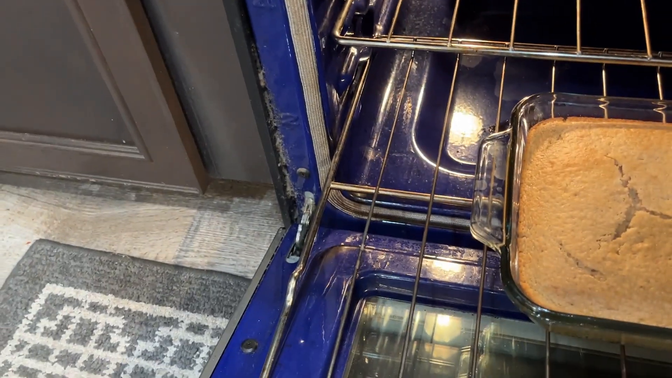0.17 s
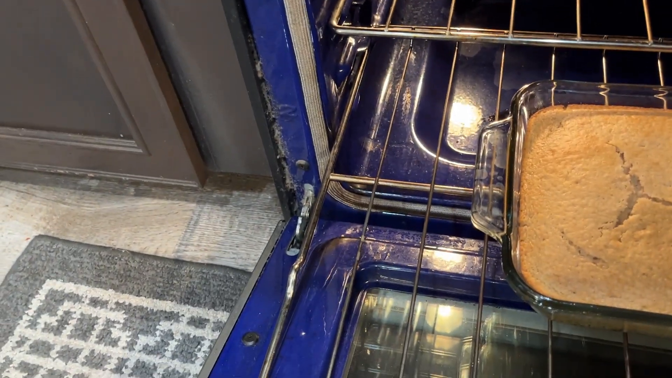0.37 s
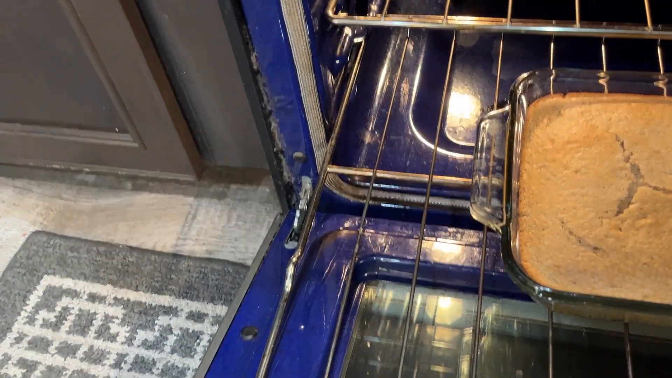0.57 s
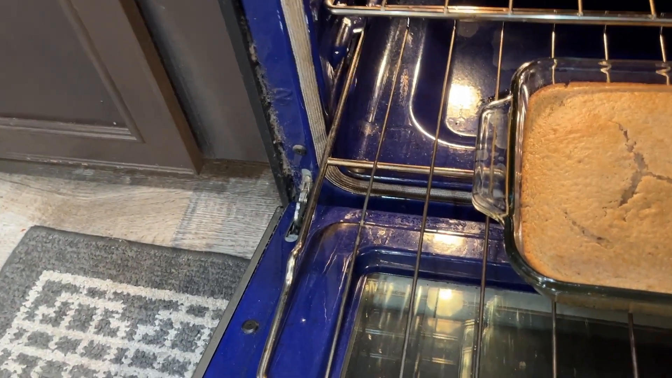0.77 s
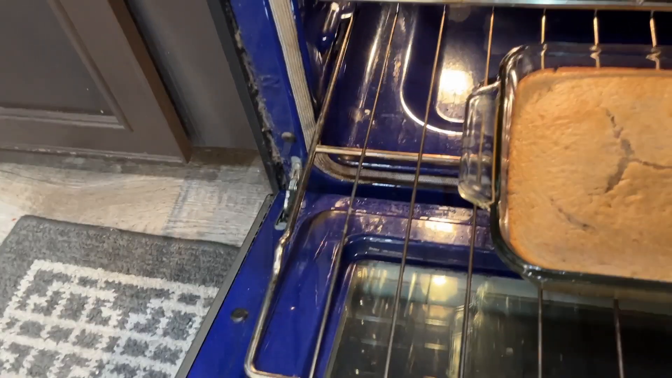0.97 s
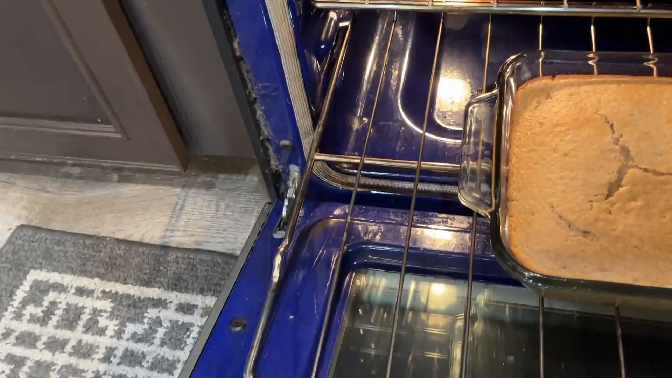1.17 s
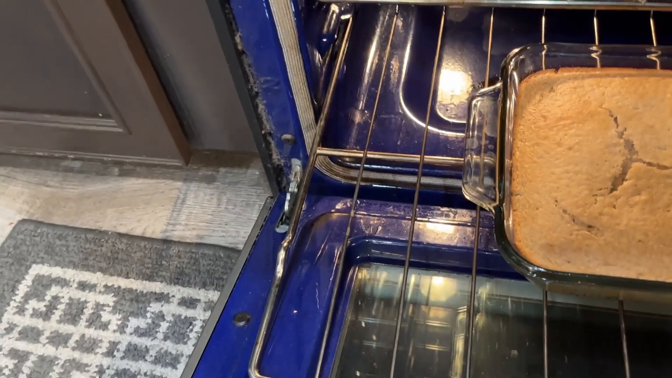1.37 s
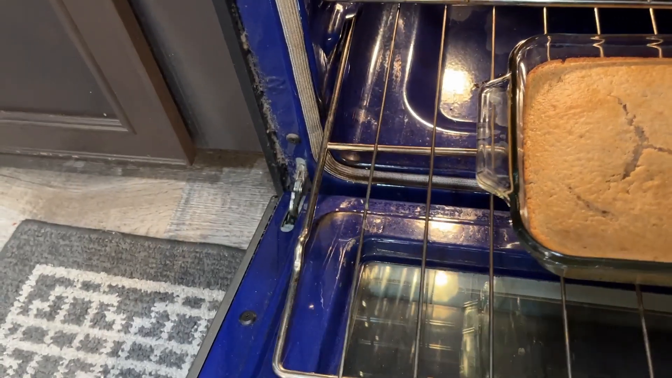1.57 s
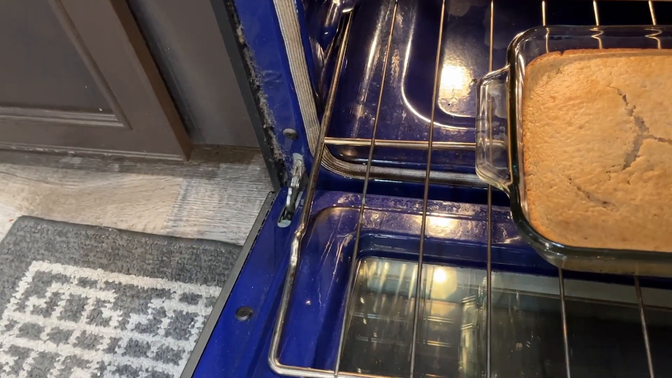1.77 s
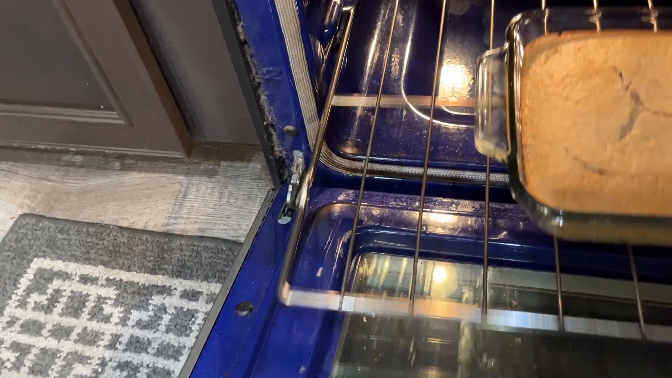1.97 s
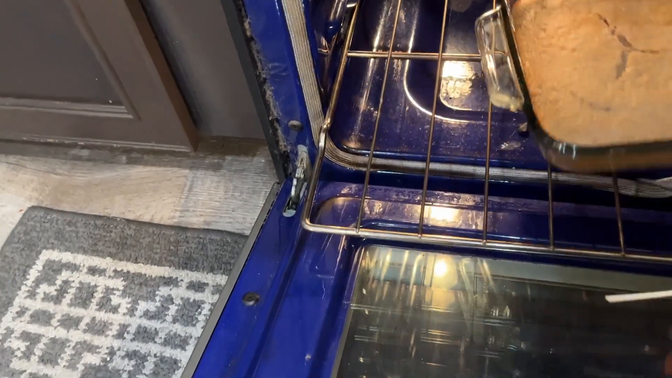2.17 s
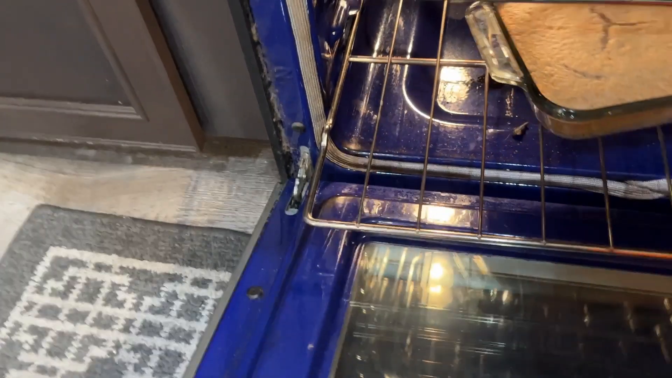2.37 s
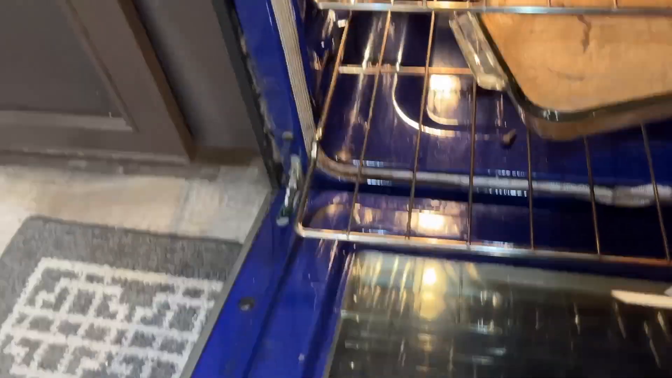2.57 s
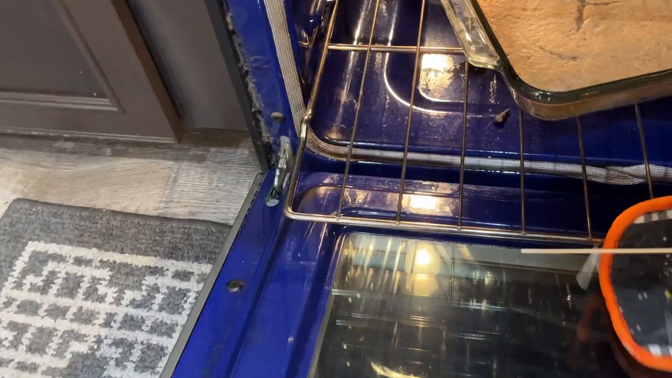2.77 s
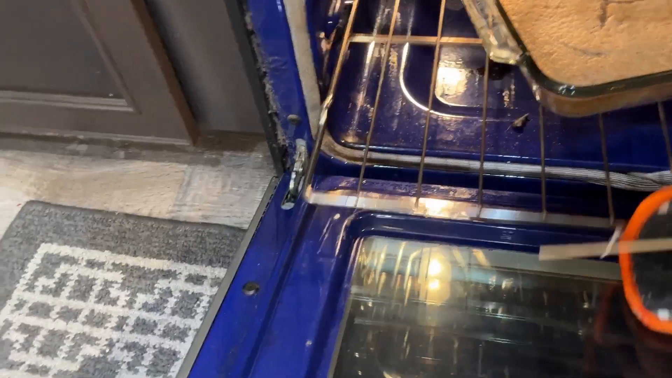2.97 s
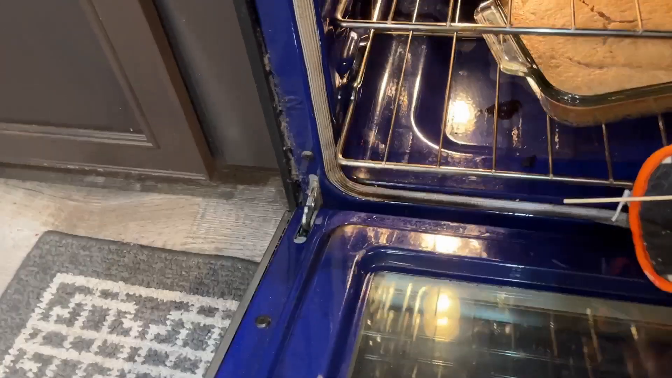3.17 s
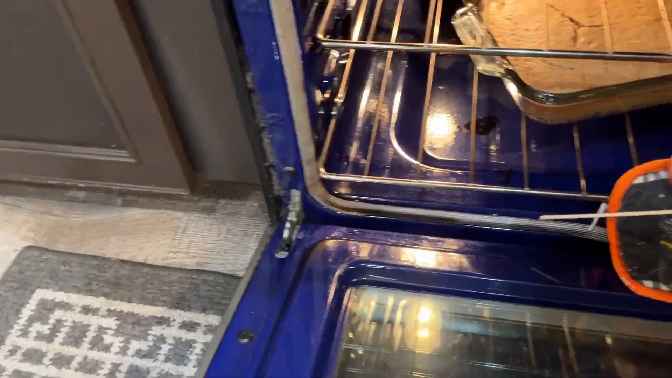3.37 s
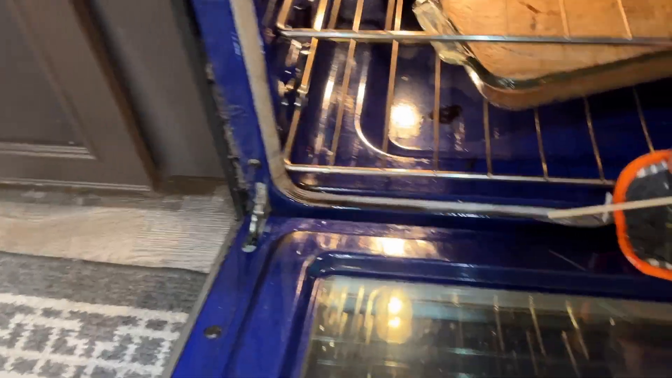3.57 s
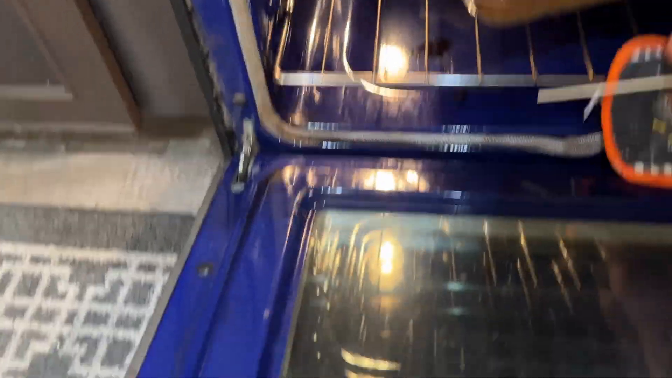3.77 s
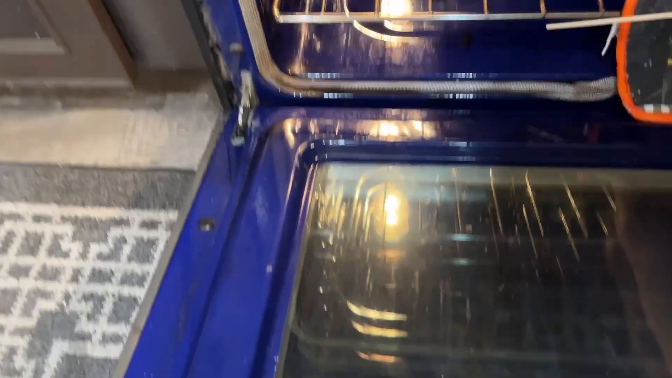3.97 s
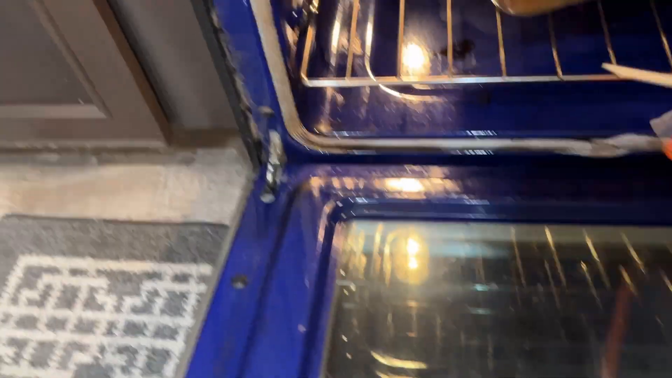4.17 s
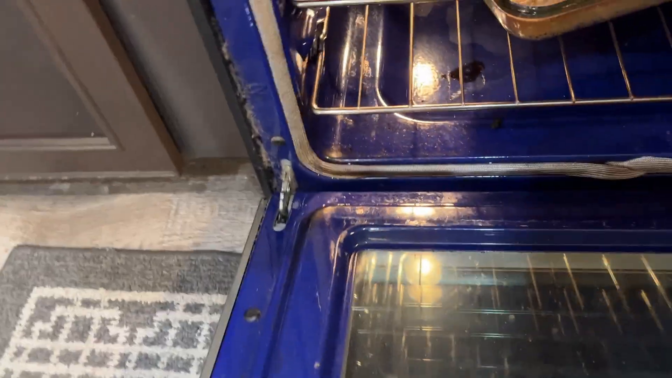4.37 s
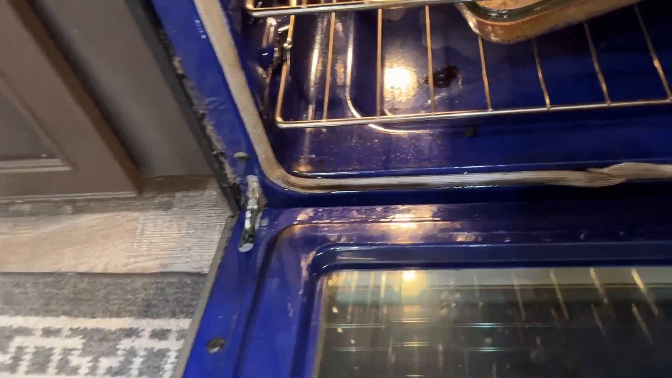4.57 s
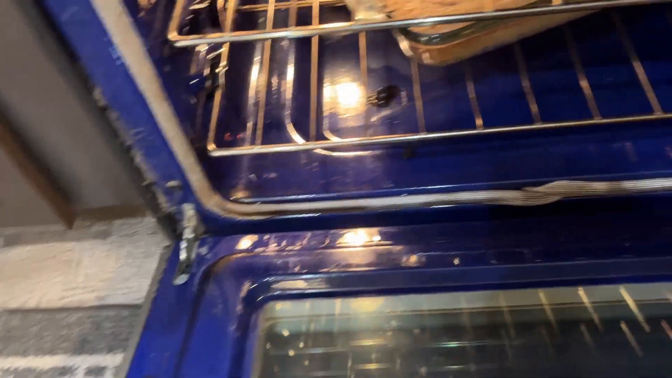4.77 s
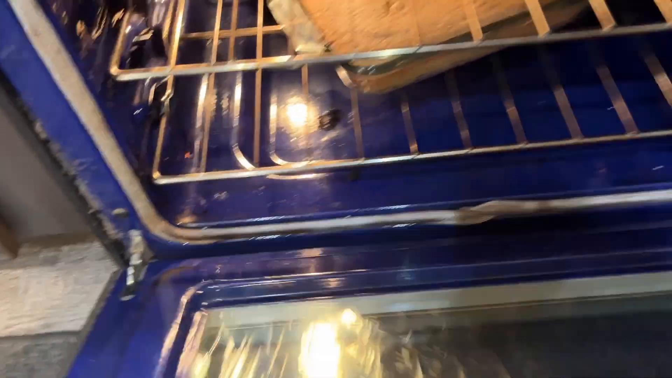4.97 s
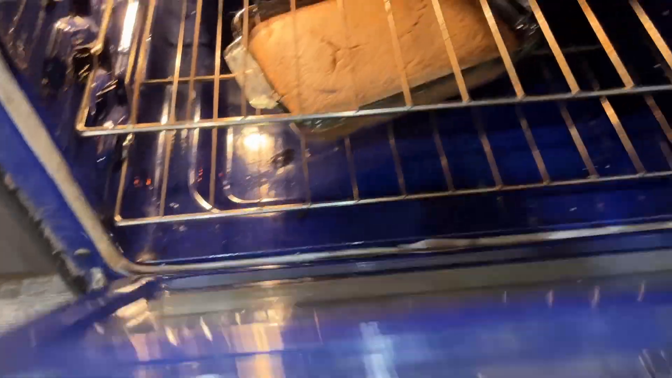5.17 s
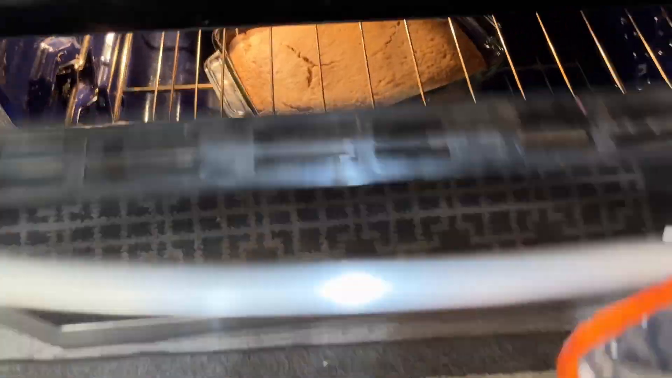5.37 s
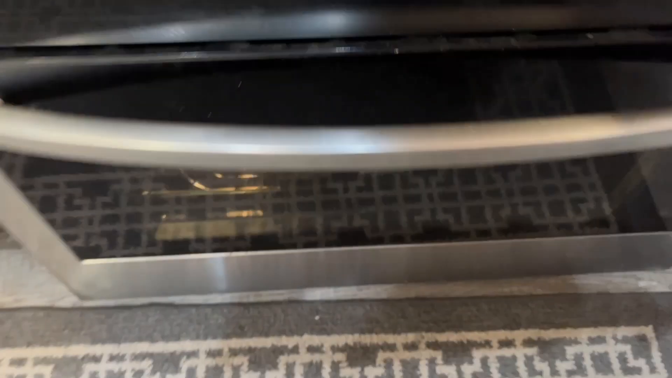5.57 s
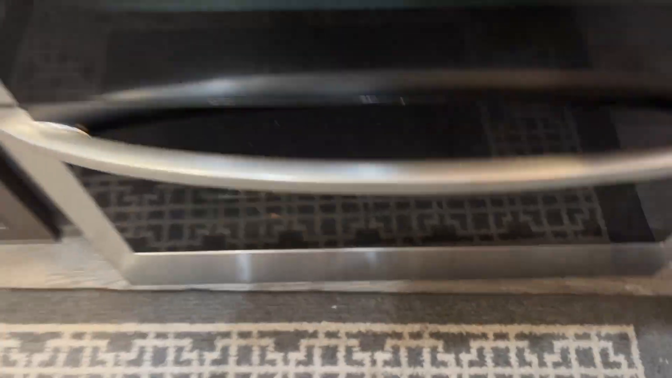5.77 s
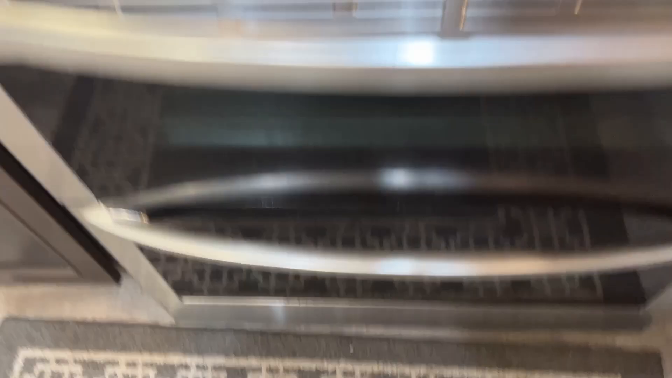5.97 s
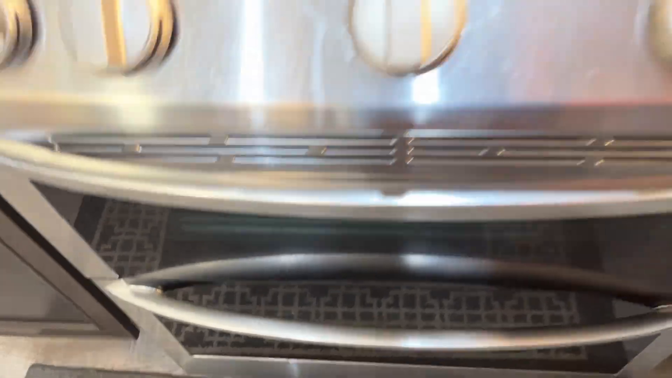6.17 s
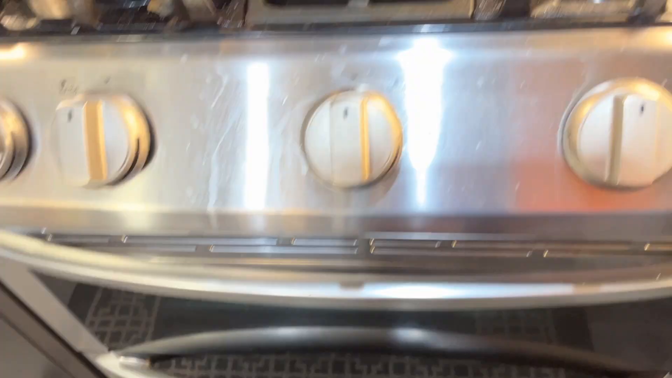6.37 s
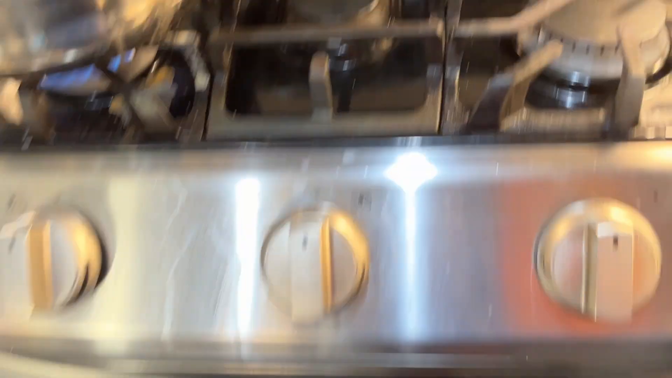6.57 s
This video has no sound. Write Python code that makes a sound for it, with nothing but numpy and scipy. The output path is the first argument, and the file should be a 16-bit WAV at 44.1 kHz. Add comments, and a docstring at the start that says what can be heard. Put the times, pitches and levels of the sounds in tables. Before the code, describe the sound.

A wire oven rack holding a glass dish scrapes and clanks inward in bursts, then the oven door shuts with a heavy thud under a steady fan roar.

```python
"""A kitchen fan roars from start to end round a phone held in the hand near an oven; one early knock.
From about 1.4 s a wire oven rack with a glass dish is shoved along its runners in scrapes and knocks,
until 3.8 s: tiny slips, bounces and blows ring wires, glass and oven walls as decaying modes.
A lone tick follows, then hinge and springs squeak as narrow noise and near 5.6 s the heavy door shuts,
pushing a gust of air; squeaks go on after it. Left and right differ in phase and balance by frequency."""
import sys
import numpy as np
from scipy import signal
from scipy.fft import rfft, irfft
from scipy.io import wavfile
from scipy.ndimage import uniform_filter1d

SR = 44100
rng = np.random.default_rng(int(sys.argv[2]) if len(sys.argv) > 2 else 0)


def master_out(mix):
    """Clip the mix to full scale and print it as 16-bit PCM to the path in sys.argv[1]."""
    frames = np.transpose(np.atleast_2d(mix))
    ceiling = np.clip(frames, -1, 1)
    pcm = np.round(ceiling * 32767).astype(np.int16)
    wavfile.write(sys.argv[1], SR, pcm)


N = 291324

# Table levels are those ahead of the gains in the functions; spectra give shape only.
# Shoves of the rack: (top [s], rise [s], hold [s], t60 [s], scrape level [dB],
# fizz relative to scrape [dB], rumble level of the oven walls [dB])
SHOVES = [ (1.463, 0.11, 0.091, 0.49, -40.5, -18, -26.5), (1.919, 0.061, 0.072, 0.32, -34, -16, -30),
          (1.976, .005, 0.045, .3, -28, -19, -24.5), (2.028, 0.026, 0.035, 0.37, -20.5, -16, -21),
          (2.094, 0.059, 0.04, 0.3, -24, -14.5, -21.5), (2.203, 0.041, 0.04, 0.69, -31.5, -20.5, -26.5),
          (2.397, 0.035, 0.013, 0.25, -33, -20, -23), (2.454, 0.062, 0.047, 0.48, -61, -28, -26.5),
          (2.788, 0.058, 0.021, 0.18, -43, -36, -29), (2.85, 0.021, 0.011, 0.14, -47.5, -0.5, -50),
          (2.967, 0.1, 0.028, 0.33, -36.5, -15, -27), (2.994, 0.013, 0.044, 0.35, -27.5, -12.5, -19.5),
          (3.058, 0.061, 0.047, 0.65, -29.5, -18, -38), (3.693, 0.015, 0.014, 0.18, -28.5, -9, -20),
          (3.747, 0.02, 0.02, 0.2, -36, -12, -24.5), (3.782, 0.098, 0.038, 0.23, -34, -17.5, -31), ]
# Wires and bars of rack and runners: (frequency [Hz], level [dB], t60 [s])
RACK_MODES = [(360, 7.5, 0.035), (438, 2.5, 0.019), (630, -5, 0.043), (693, -21, 0.25), (820, -26, 0.13),
              (844, -2.5, 0.04), (928, -10, 0.11), (1075, 4.5, 0.035), (1172, -4, 0.2), (1240, -0.5, 0.053),
              (1310, 0.5, 0.066), (1485, -5, 0.16), (1710, -2, 0.039), (1987, -2, 0.037),
              (2204, -8.5, 0.025), (1922, -11, 0.12), (2284, -6, 0.068), (2460, -5, 0.015),
              (2594, -5, 0.032), (2865, -16, 0.11), (3100, -3, 0.023), (3340, -7, 0.048),
              (3490, -20, 0.042), (3865, -12, 0.056), (4320, -4.5, 0.019), (5150, -18, 0.027),
              (5400, -45, 0.03), (5900, -40, 0.024), (6140, -24, 0.093), (6800, -33, 0.024)]
# Unringing contact of metal on metal: (frequency [Hz], level [dB per Hz])
GRIT_SPECTRUM = [(300, -34), (700, -2), (2200, -7), (4000, -12), (7500, -34), (9000, -50)]
# Fine fizz of the scrape: (frequency [Hz], level [dB per Hz])
FIZZ_SPECTRUM = [(5000, 0.5), (7500, 1.5), (9600, -0.5), (11500, -1), (13500, -1.5), (15500, -11)]
# Treble of a knock: (frequency [Hz], level [dB per Hz])
SNAP_SPECTRUM = [(3000, -7), (6000, -5), (9600, -1.5), (11500, -7.5), (13000, -9), (15500, -14)]
# Metal knocks and ticks: (time [s], clank level [dB], fizz relative to clank [dB],
# rattle t60 [s], pitch centre [Hz])
KNOCKS = [(0.0326, -29, -9.5, 0.097, 3820), (1.4484, -43, -4, 0.07, 2000),
          (1.5197, -35.5, -8.5, 0.066, 2000), (1.966, -16.5, -40, 0.22, 1570),
          (2.030, -18, -22, 0.09, 2150), (2.052, -20, -19, 0.064, 1290), (2.082, -23, -6.5, 0.09, 3200),
          (2.124, -24, -5, 0.046, 3180), (2.2234, -37, -17, 0.058, 2700), (2.399, -23.5, -17, 0.12, 2500),
          (2.7853, -20.5, -43, 0.092, 2160), (2.836, -30.5, -20, 0.11, 2700),
          (2.8593, -29.5, -19, 0.1, 2800), (2.9947, -21, -14, 0.1, 1960), (3.02, -19, -23, 0.059, 1250),
          (3.064, -21, -21, 0.037, 1160), (3.689, -21.5, -18.5, 0.21, 3100),
          (4.4726, -28, -4.5, 0.043, 4500), (5.0912, -33.5, -22, 0.044, 2920),
          (5.349, -31.5, -8.5, 0.04, 3100), (5.5285, -19.5, -27, 0.047, 1500),
          (5.585, -16, -7, 0.029, 5460), (5.614, -19.5, -24, 0.033, 3900),
          (5.6277, -17.5, -27, 0.037, 3900), (5.633, -24.5, -28, 0.04, 3300),
          (5.682, -24, -25, 0.023, 3830)]
# Single short rings: rack wires, then from 5.5 s door catch rattle and springs:
# (time [s], level [dB], pitch [Hz], t60 [s])
SHORT_RINGS = [(1.902, -31, 1970, .07), (1.951, -26, 1284, .06), (1.965, -20, 1284, 0.16),
               (1.967, -20.5, 2020, .1), (1.978, -31, 3460, .05), (1.995, -22, 2250, 0.077),
               (2.027, -17, 3180, .06), (2.030, -19, 2190, 0.11), (2.040, -13, 1288, 0.091),
               (2.045, -15, 690, .09), (2.086, -16, 350, .08), (2.092, -21, 1682, 0.086),
               (2.098, -33, 1320, .08), (2.105, -29, 2220, 0.071), (2.075, -19, 2100, 0.062),
               (2.112, -12, 3170, 0.044), (2.133, -22, 3270, .05), (2.142, -17, 1070, .06),
               (2.202, -28, 2640, 0.14), (2.238, -22, 920, .08), (2.243, -35.5, 3470, .07),
               (2.262, -32, 1250, .07), (2.962, -27, 2010, 0.12), (2.984, -21, 1250, .05),
               (2.992, -18, 1963, .08), (2.997, -13.5, 352, 0.076), (3.004, -16.5, 1926, 0.06),
               (3.008, -18, 3450, 0.051), (3.010, -22, 1310, 0.11), (3.033, -19, 1310, 0.057),
               (3.066, -22, 1176, 0.11), (3.070, -25, 1990, .09), (3.105, -27, 2230, 0.073),
               (3.109, -32, 1100, 0.067), (3.097, -28, 1940, .08), (3.132, -25, 2040, .08),
               (3.182, -24, 1320, .04), (3.687, -22, 2880, 0.056), (3.694, -29, 2140, .07),
               (3.700, -18.5, 440, 0.066), (3.712, -24, 3280, .08), (3.714, -33, 394, 0.058),
               (3.750, -33, 2210, .1), (3.755, -26, 1200, .08), (3.817, -29, 2200, .1),
               (3.832, -28, 1260, .06), (5.530, -27, 3540, .06), (5.585, -21, 5130, .03),
               (5.614, -32, 3900, .03), (5.628, -27, 3840, 0.04), (5.629, -28, 4350, .035),
               (5.633, -28, 3300, .03), (5.684, -35, 4000, .03), (5.703, -26, 1780, 0.054),
               (5.748, -25, 1874, 0.071), (5.755, -29, 1710, 0.066), (5.827, -36, 1254, .07),
               (5.872, -31, 1890, 0.068)]
# A short wire end: (frequency [Hz], level [dB], t60 [s])
WIRE_END_MODES = [(10550, 0, .1), (10700, -6, .06), (11000, -6, .05), (11600, -3, .05)]
# Taps on the wire end: (time [s], level [dB])
WIRE_END_TAPS = [(2.084, -23.5), (2.224, -27.5)]
# Glass dish: (frequency [Hz], level [dB], t60 [s])
DISH_MODES = [(4000, -2, 0.035), (4300, 3.5, 0.032), (4460, -1.5, 0.03), (4670, -10, 0.037),
              (4870, -18, 0.025), (5130, -20, 0.023)]
# The dish chatters on the wires: (rise [s], hold [s], t60 [s], level [dB])
DISH_CHATTER = (0.03, 0.09, 0.18, -37.5)
# Oven walls: (frequency [Hz], level [dB], t60 [s])
WALL_MODES = [(90.4, -8, 0.12), (114.4, 0, 0.13), (164, -9, 0.058), (241, -14.5, 0.24), (274, -13, 0.092)]
# The rack thumps its stops: (time [s], level [dB])
STOP_BLOWS = [(2.062, -7), (2.088, -7), (2.112, -3), (2.148, -20), (2.175, -7), (2.203, -9), (3.011, -5.5),
              (3.029, -17), (3.058, -15), (3.229, -9), (3.712, -18), (3.731, -5), (3.744, -9)]
# Deep thud, as of the whole door on its seal: (frequency [Hz], level [dB], t60 [s])
THUD_MODES = [(45, -13, .06), (64, -6, .08), (76, 0, .075), (124, -11, .06), (165, -12, .06)]
# Deep dull blows: the early one from the rack knocking, later ones from the door shutting:
# (time [s], level [dB])
THUD_BLOWS = [(1.598, -22), (5.600, -9), (5.6132, 1.5), (5.6385, 0.5), (5.680, -14), (5.702, -12),
              (5.715, -12)]
# Middle thump, as of the inner door panel: (frequency [Hz], level [dB], t60 [s])
PANEL_MODES = [(194, -11, 0.04), (279, -2.5, 0.065), (346, -1.5, 0.071), (411, -3, 0.042), (530, -5, 0.022),
               (700, -6, 0.034), (825, -15.5, 0.041), (1067, -15.5, 0.047), (1250, -18, 0.025),
               (1530, -19, 0.029)]
# Dull blows: early ones from the rack knocking, later ones from the door shutting:
# (time [s], level [dB])
PANEL_BLOWS = [(1.601, -15.5), (3.226, -26), (5.530, -8), (5.5785, -6.5), (5.600, -13.5), (5.651, -19)]
# Door catch: (frequency [Hz], level [dB], t60 [s])
LATCH_MODES = [(1155, -5, 0.038), (1337, -2, 0.051)]
# Blows to the catch: (time [s], level [dB])
LATCH_BLOWS = [(5.614, -19), (5.630, -16)]
# Air pushed by the closing door: (rise [s], hold [s], t60 [s], level [dB]);
# the hold is below 0, so decay sets in ahead of the top and the peak stays under the level
DOOR_GUST = (0.6, -0.94, 8.5, -27)
# Squeaks of hinge and springs: (start [s], length [s], pitch [Hz], level [dB], bandwidth [Hz])
SQUEAKS = [(5.083, 0.078, 1250, -39, 120), (5.162, 0.054, 4270, -47, 400), (5.12, 0.035, 1150, -43, 100),
           (5.145, .04, 1330, -42, 89), (6.4, 0.048, 1290, -40, 79), (5.26, 0.078, 1314, -37.5, 62),
           (5.345, 0.034, 1180, -36, 160), (5.243, 0.11, 1700, -40, 80), (5.24, 0.11, 946, -40.5, 70),
           (5.09, .2, 1280, -42.5, 250), (6, 0.21, 1300, -40, 300), (6.5, 0.05, 1100, -36, 210),
           (5.655, 0.062, 1730, -39, 190), (5.74, 0.12, 1800, -38, 260), (5.79, 0.064, 2230, -42, 96),
           (5.93, .07, 1600, -37, 200), (6.2, 0.14, 1200, -46, 240), (5.663, 0.45, 1100, -42.5, 403)]
# The fan as the phone moves about: (time [s], roar level [dB], drone relative to roar [dB])
FAN_LEVELS = [(0.0, -30, -33), (0.45, -30.5, -20), (1.4, -30, -28), (2.5, -30, -11), (3.5, -30, -52),
              (5.05, -30.5, -10), (5.35, -29.5, -12), (5.65, -26, -3), (6.2, -27.5, -3.5), (6.61, -28, -2)]
# Body of the fan roar: (frequency [Hz], level [dB per Hz])
ROAR_SPECTRUM = [(40, -2.5), (70, -1), (95, -1), (140, -4.5), (175, -3), (220, 5.5), (250, -1), (280, 4),
                 (340, -3.5), (420, -6), (500, -11), (650, -11.5), (900, -31.5)]
# Upper part of the fan noise: (frequency [Hz], level [dB per Hz])
HISS_SPECTRUM = [(300, -7.5), (600, 1.5), (800, -2), (1100, 1.5), (1500, -0.5), (1800, -5.5), (2500, -10),
                 (4100, -12), (5500, -16.5), (7000, -23.5), (10000, -28.5), (14000, -33), (16000, -50)]
# Air in the oven box: (frequency [Hz], level [dB per Hz])
DRONE_SPECTRUM = [(125, -20), (155, -1.5), (190, -7), (220, -3.5), (260, -61)]
# Slow gusts of air at the phone: (frequency [Hz], level [dB per Hz])
GUST_SPECTRUM = [(22, -21), (38, -11), (55, 0), (75, -8), (120, -7), (160, -38)]
# Left-right pair, likeness, phase lead and balance by frequency: (frequency [Hz],
# left-right likeness [0 to 1], phase lead of the right [rad], left louder by [dB])
STEREO_PAIR = [(60, .99, 0., -.2), (340, .88, .25, -.6), (520, .6, .3, -.6), (800, .2, .5, -1),
               (1200, .3, .8, -1), (1550, .5, 2.3, -2.5), (1750, .3, 1., 0), (1900, .85, -.2, 1.5),
               (3400, .7, -.9, 1.5), (4800, .7, -.3, 3), (5500, .4, .9, 3), (6900, .65, 1.6, 1),
               (7500, .8, 2.6, 0), (8000, 1, 3.14, 0), (8700, 1, 3.14, 0), (9500, .75, 4.3, 0),
               (10400, .75, 5.2, 0), (11200, 1, 6.28, 0), (12800, 1, 6.28, 0), (13500, .7, 7.3, 0),
               (14400, .9, 8.9, 0), (14800, 1, 9.42, 0)]

DISH_TOP_S, DOOR_TOP_S = 2.397, 5.61
LOAD_DB = -2  # weight on the frame bars relative to the scrape
FRAME_TOP_HZ = 1400  # modes below it are thick bars
WALL_LAG_S = 0.012  # the wall rumble follows the scrape late
THUMP_DAMPING = 0.3  # the pressing rack shortens the ring of the walls
TWIN_SHARP, TWIN_DB = 1.03, -11  # pitch factor and relative level of the second, sharper ring
STUTTER_DB = 1.5  # the hinge grips and lets go
RISE_DB = 21  # climb of a swell over one rise
HISS_DB = -6.5  # relative to the roar
ROAR_WOBBLE_DB = 1.5
GUST_DB, GUST_WANDER_DB = -54.5, 1.5  # deep gusts all along
EDGE_HZ = 15700  # no treble is kept above this frequency


def rack():
    """Slips on the runners ring wires and oven walls; grit and fizz pass straight to the air."""
    scrape, weight, fizz, rumble = rack_drive()
    clank, crack, snap = knocks()
    force = slips(per_s=3500, spread_db=2.5)
    bars = [mode for mode in RACK_MODES if mode[0] < FRAME_TOP_HZ]
    thin_wires = [mode for mode in RACK_MODES if mode[0] >= FRAME_TOP_HZ]
    frame = rub(weight * force, bars, wander_db=3)
    wires = rub(scrape * force, thin_wires, wander_db=3)
    grit = np.hypot(scrape, crack) * evened(coloured(force, GRIT_SPECTRUM))
    specks = slips(per_s=14000, spread_db=1.2)
    sizzle = fizz * evened(coloured(specks, FIZZ_SPECTRUM))
    # reversed in time, the same specks no longer coincide with the fizz
    sizzle = sizzle + snap * evened(coloured(specks[:, ::-1], SNAP_SPECTRUM))
    boom = rub(rumble * slips(per_s=800, spread_db=1.5), WALL_MODES, wander_db=1.5)
    # the wall rumble carries no deep bass below about 60 Hz
    boom = signal.sosfilt(signal.butter(2, 60, "high", fs=SR, output="sos"), boom)
    ringing = gain_of(-8.5) * frame + gain_of(-13.5) * wires
    return clank + ringing + gain_of(-2.5) * grit + gain_of(6.5) * sizzle + gain_of(-0.5) * boom


def rack_drive():
    """Envelopes of scrape, weight, fizz and rumble, summed in power; the scrape comes in uneven jerks."""
    power = np.zeros((3, N))
    for top, rise, hold, t60, db, fizz_db, wall_db in SHOVES:
        power[0] += swell(top, rise, hold, t60, db) ** 2
        power[1] += swell(top, rise, hold, t60, db + fizz_db) ** 2
        power[2] += swell(top + WALL_LAG_S, rise, hold, t60, wall_db) ** 2
    scrape, fizz, rumble = np.sqrt(power)
    jerks = gain_of(1.7 * drift(110))
    return scrape * jerks, scrape * gain_of(LOAD_DB) * jerks, fizz * np.sqrt(jerks), rumble


def knocks():
    """Bursts of bounces ring the wires near each knock's pitch; gives ring, crack and snap envelopes."""
    t = np.arange(SR // 3) / SR
    clank, contact = np.zeros((2, N + SR)), np.zeros((2, N + SR))
    for s, db, fizz_db, t60, hz in KNOCKS:
        at = round(s * SR)
        rattle = gain_of(db - 60 * t / max(t60, .01)) * np.minimum(t / 0.00079, 1)
        # modes lose 10 dB per octave away from the pitch centre
        modes = [(f, 0.58 * level - 10 * abs(np.log2(f / hz)), 0.39 * decay)
                 for f, level, decay in RACK_MODES]
        wires = ring(modes, 4.24)
        wires = wires / np.linalg.norm(wires[0])
        hits = rng.random(len(t)) < 6000 / SR  # 6000 bounces a second on average
        bounces = rattle * rng.standard_normal((2, len(t))) * hits
        burst = signal.fftconvolve(bounces, wires, axes=1)
        clank[:, at:at + burst.shape[1]] += gain_of(6) * burst
        contact[:, at:at + len(t)] += rattle * gain_of([[-12.], [fizz_db - 0.5]])
    crack, snap = contact[:, :N]
    return clank[:, :N], crack, snap


def short_rings():
    """Single decaying tones of wires, catch and springs, each with a weaker, shorter, sharper twin."""
    out = np.zeros((2, N + SR))
    for s, db, hz, t60 in SHORT_RINGS:
        twin = (TWIN_SHARP * hz, db + TWIN_DB, 0.46 * t60)
        pair = ring([(hz, db, t60), twin], 0.36, 0.0021)
        at = round(s * SR)
        out[:, at:at + pair.shape[1]] += pair
    return out[:, :N]


def wire_end():
    """A short wire end pings in high decaying modes."""
    return strike(WIRE_END_TAPS, WIRE_END_MODES, 2.6, 0.0027)


def dish():
    """Glass chatters on wire: a swell of tiny slips drives its modes."""
    force = swell(DISH_TOP_S, *DISH_CHATTER) * slips(per_s=1400, spread_db=1)
    return rub(force, DISH_MODES, wander_db=1.5)


def stop_thumps():
    """The rack thumps its stops and rings the oven walls, damped by its pressure."""
    walls = [(hz, db, THUMP_DAMPING * t60) for hz, db, t60 in WALL_MODES]
    return strike(STOP_BLOWS, walls, .3, .004)


def deep_thuds():
    """Low decaying modes: one early rack knock, then the whole door thudding on its seal."""
    return strike(THUD_BLOWS, THUD_MODES, .15, .006)


def panel_thumps():
    """Short middle modes: early rack knocks, then the inner panel of the shutting door."""
    return strike(PANEL_BLOWS, PANEL_MODES, .2, .0008)


def door_latch():
    """The catch clicks in two short modes."""
    return strike(LATCH_BLOWS, LATCH_MODES, .4, 0.0009)


def springs():
    """Fuzzy, stuttering hinge and spring squeaks: each swells as noise in one narrow band."""
    out = np.zeros((2, N))
    for s, length, hz, db, width in SQUEAKS:
        size, at = round(length * SR), round(s * SR)
        noise = rng.standard_normal((2, 2, SR // 2))
        a, b = uniform_filter1d(noise, round(SR / width))[..., :size]
        carrier = np.exp(2j * np.pi * hz * np.arange(size) / SR)
        tone = ((a + 1j * b) * carrier).real
        out[:, at:at + size] += gain_of(db) * evened(tone) * np.hanning(size)
    return out * gain_of(STUTTER_DB * drift(60))


def fan():
    """Turbulent roar, fluttering hiss, the drone of the oven box and deep gusts, all coloured noise."""
    roar_db, drone_db = read(np.arange(N) / SR, FAN_LEVELS)
    roar, hiss, drone, deep = rng.standard_normal((4, 2, N))
    air = gain_of(ROAR_WOBBLE_DB * drift(13)) * coloured(roar, ROAR_SPECTRUM)
    air = air + gain_of(drone_db + 3.34 * drift(9)) * coloured(drone, DRONE_SPECTRUM)
    flutter_db = .5 * drift(15)
    air = air + gain_of(HISS_DB + flutter_db) * coloured(hiss, HISS_SPECTRUM)
    steady_gusts = gain_of(GUST_DB + GUST_WANDER_DB * drift(4.45))
    gusts = np.hypot(steady_gusts, swell(DOOR_TOP_S, *DOOR_GUST))
    return gain_of(roar_db) * air + gusts * coloured(deep, GUST_SPECTRUM)


def kitchen(x):
    """Oven cavity and room: a short decaying tail of noise, different in each view."""
    t = np.arange(SR // 2) / SR
    tail = rng.standard_normal((2, len(t))) * gain_of(-60 * t / 0.13) * (t > .004)
    return signal.fftconvolve(x, tail / np.linalg.norm(tail[0]), axes=1)[:, :N]


def slips(per_s, spread_db):
    """Tiny stick-slip clicks of uneven size at random times, rms 1, signs drawn for each view."""
    size = gain_of(spread_db * np.minimum(rng.exponential(1, N), 4)) * (rng.random(N) < per_s / SR)
    return evened(size) * rng.choice([-1., 1.], (2, N))


def rub(force, modes, wander_db):
    """Drives each mode of a body; the point of contact wanders, so the modes take turns."""
    out = np.zeros((2, N))
    for hz, db, t60 in modes:
        r = gain_of(-60 / (t60 * SR))  # decay per sample
        push = force * gain_of(db + wander_db * drift(40)) * np.sqrt(1 - r * r) / 2
        poles = [1, -2 * r * np.cos(2 * np.pi * hz / SR), r * r]
        out += signal.lfilter([1, 0, -1], poles, push)
    return out


def ring(modes, spread, rise=0.000059):
    """Two views of a struck body, a quarter cycle apart and scattered in phase; a soft blow swells in."""
    t = np.arange(SR // 3) / SR
    shift = spread * rng.uniform(-0.87, 1, (len(modes), 2, 1)) + [[0], [np.pi / 2]]
    free = np.zeros((2, len(t)))
    for (hz, db, t60), phase in zip(modes, shift):
        free += gain_of(db - 60 * t / t60) * np.sin(2 * np.pi * hz * t + phase)
    return free * (1 - np.exp(-t / rise))


def strike(blows, modes, spread, rise):
    """Rings one body, the same way each time, at each (time [s], level [dB])."""
    train = np.zeros((1, N))
    for s, db in blows:
        train[0, round(s * SR)] = gain_of(db)
    return signal.fftconvolve(train, ring(modes, spread, rise), axes=1)[:, :N]


def swell(top, rise, hold, t60, db):
    """Gain that climbs to db at top, starting two rises ahead, holds, then dies away."""
    t = np.arange(N) / SR - top
    climb = np.clip(-t / max(rise, .002), 0, None)
    fall_db = 60 * np.clip(t - hold, 0, None) / max(t60, .02)
    return (climb < 2) * gain_of(db - RISE_DB * climb - fall_db)


def drift(per_s):
    """Slow chance: random knots of rms 1, at most 120 a second, joined by straight lines."""
    knots = rng.standard_normal(int(N / SR * 120) + 2)
    return np.interp(np.arange(N) / SR * min(per_s, 120), np.arange(len(knots)), knots)


def coloured(x, spectrum):
    """Filters x by a (frequency [Hz], level [dB]) spectrum of unit power, closed at both ends."""
    hz = np.fft.rfftfreq(N, 1 / SR)
    f, db = np.transpose(spectrum)
    gain = gain_of(np.interp(np.log(hz + 1), np.log(f), db, -90, -90))
    return irfft(rfft(x) * evened(gain), N)


def read(at, points):
    """Columns of a table joined by straight lines."""
    first, *columns = np.transpose(points)
    return [np.interp(at, first, c) for c in columns]


def evened(x):
    """Scales to rms 1."""
    return x / np.sqrt(np.mean(x ** 2) + 1e-20)


def gain_of(db):
    """Decibels to gain."""
    return 10 ** (np.asarray(db) / 20)


def scene():
    """Two views of the sound field around the phone; deep thumps and fan reach it without the room tail."""
    near = rack() + short_rings() + wire_end() + dish()
    near = near + panel_thumps() + door_latch() + springs()
    return near + gain_of(-6.5) * kitchen(near) + stop_thumps() + deep_thuds() + fan()


def record(dry):
    """Bass cut; left and right share one view turned in phase and differ by the other; treble cut."""
    like, lead, left_db = read(np.fft.rfftfreq(N, 1 / SR), STEREO_PAIR)
    bass_cut = signal.butter(2, 35, "high", fs=SR, output="sos")
    first, second = rfft(signal.sosfilt(bass_cut, dry))
    apart = np.arccos(np.clip(like, 0, 1)) / 2  # mixing angle that gives the likeness
    shared, own = np.cos(apart) * first, np.sin(apart) * second
    turn = gain_of(left_db / 2) * np.exp(-.5j * lead)  # half to each side
    pair = irfft([(shared + own) * turn, (shared - own) / turn], N)
    treble_cut = signal.firwin(511, EDGE_HZ, window=("kaiser", 9), fs=SR)
    return signal.oaconvolve(pair, treble_cut[None], "same")


dry = scene()
out = record(dry)
master_out(out)
```